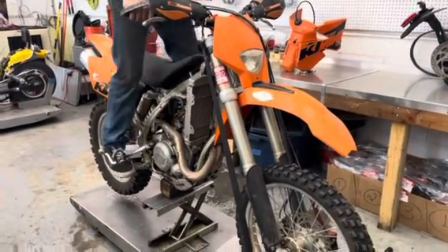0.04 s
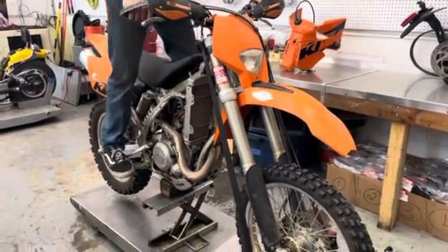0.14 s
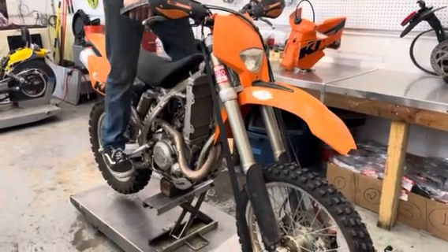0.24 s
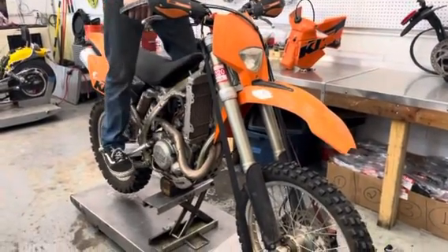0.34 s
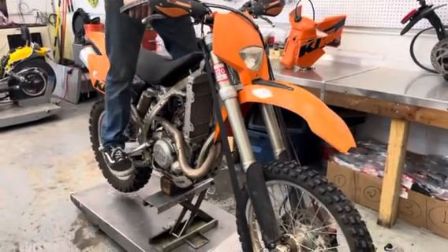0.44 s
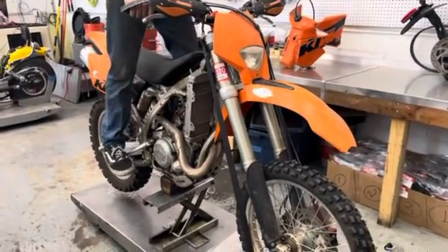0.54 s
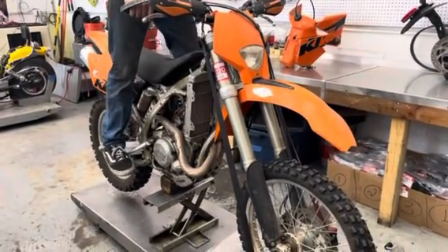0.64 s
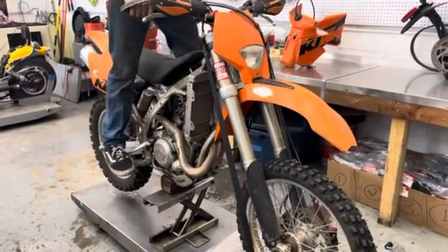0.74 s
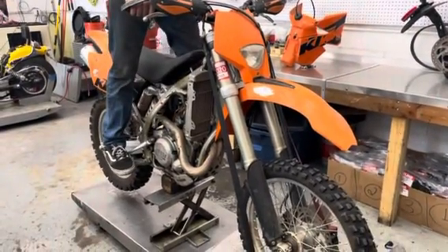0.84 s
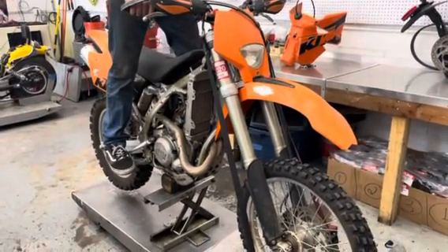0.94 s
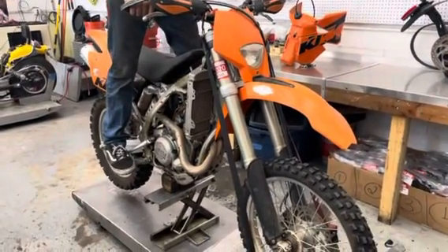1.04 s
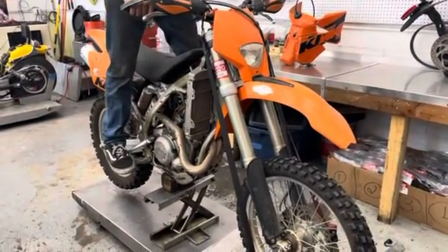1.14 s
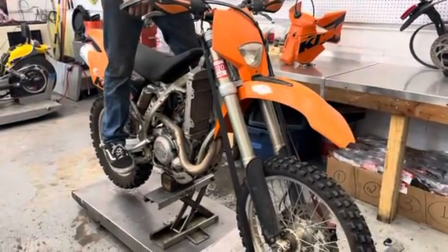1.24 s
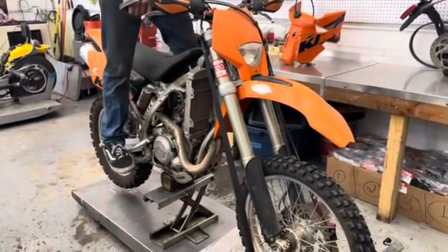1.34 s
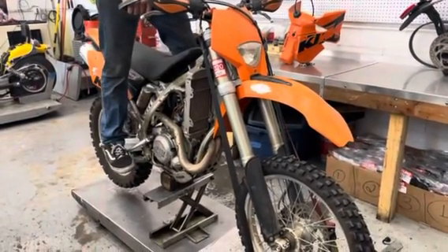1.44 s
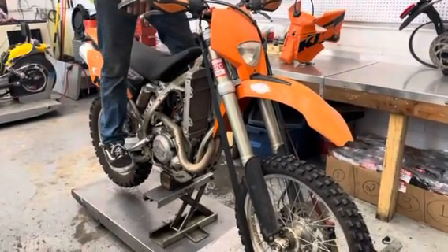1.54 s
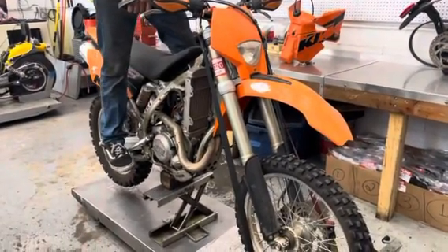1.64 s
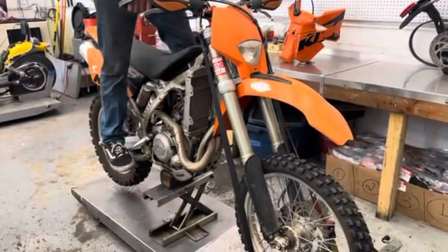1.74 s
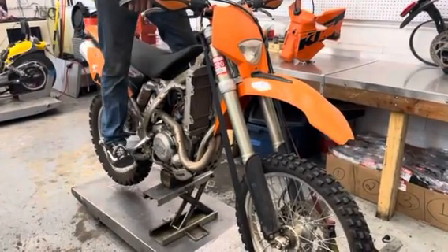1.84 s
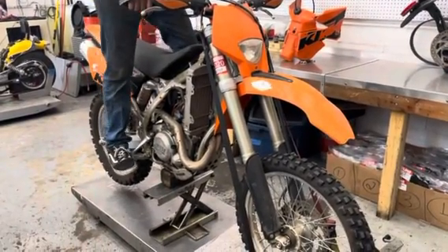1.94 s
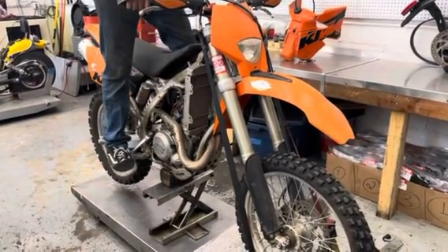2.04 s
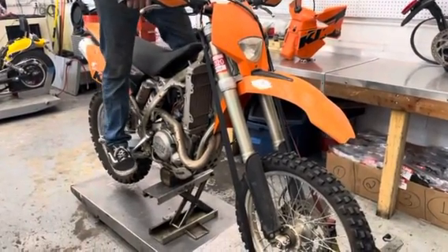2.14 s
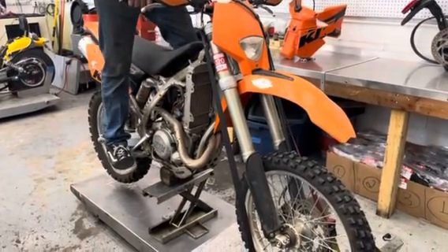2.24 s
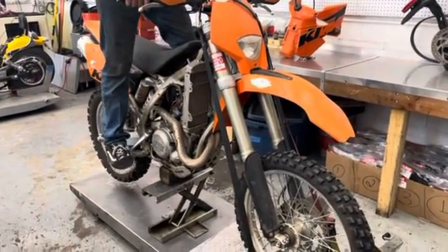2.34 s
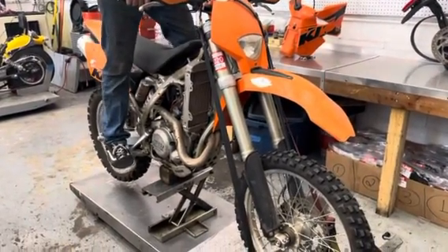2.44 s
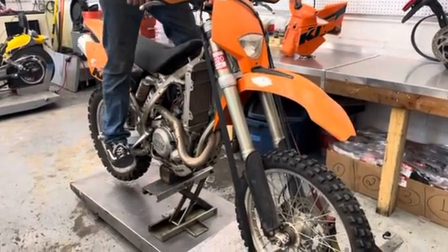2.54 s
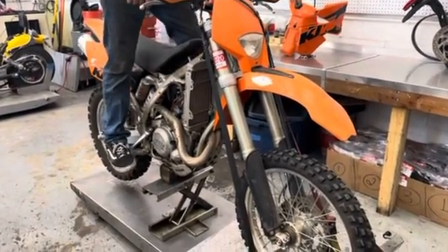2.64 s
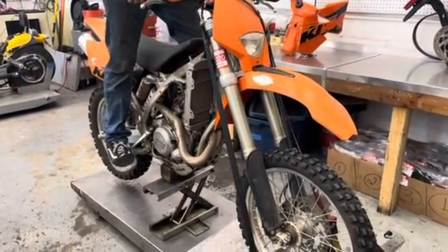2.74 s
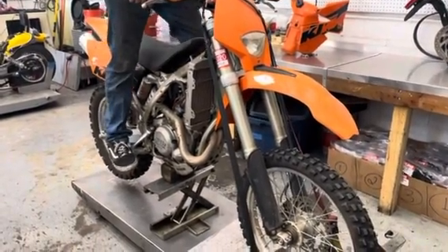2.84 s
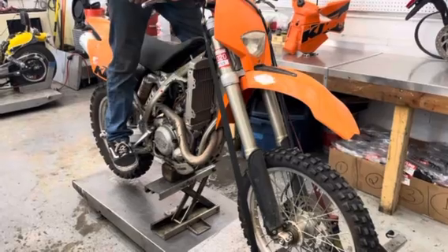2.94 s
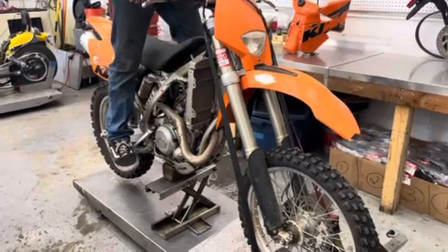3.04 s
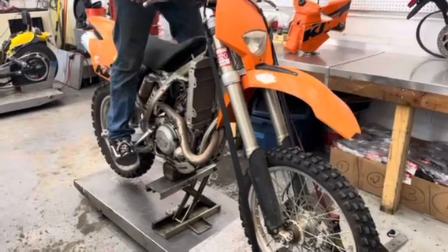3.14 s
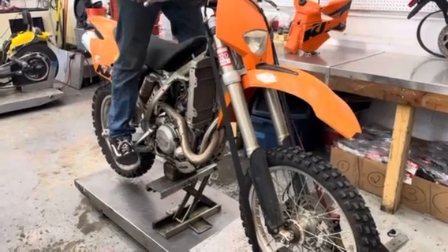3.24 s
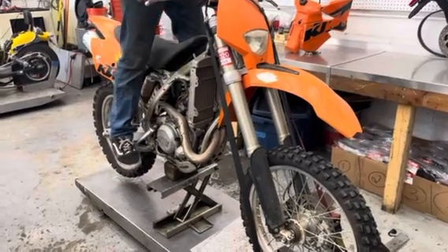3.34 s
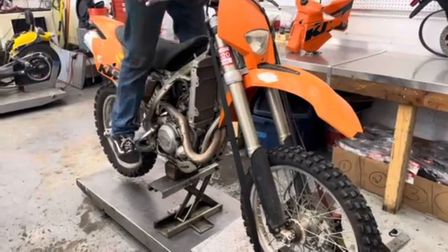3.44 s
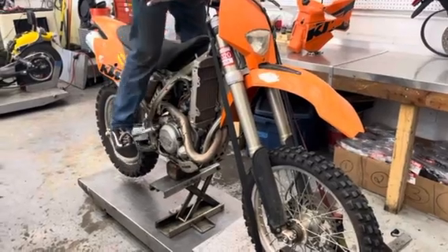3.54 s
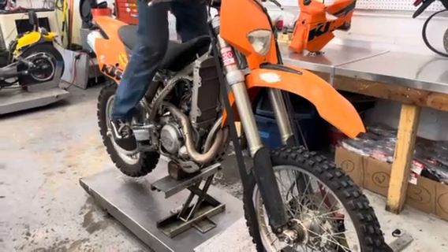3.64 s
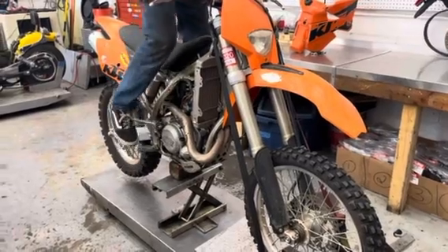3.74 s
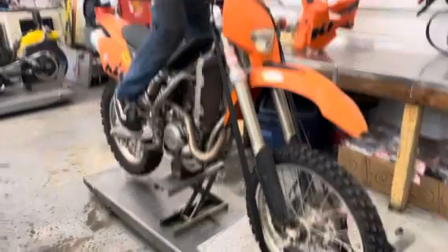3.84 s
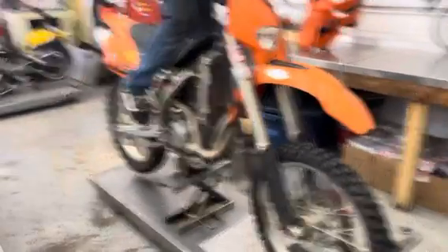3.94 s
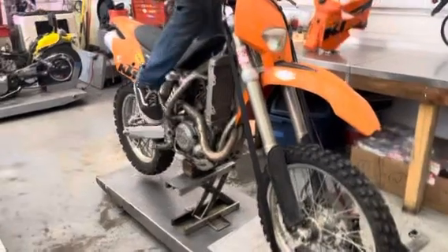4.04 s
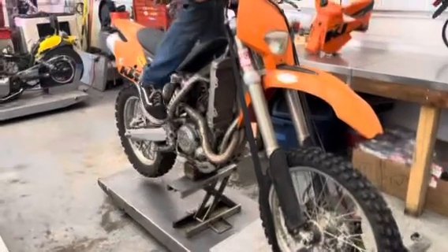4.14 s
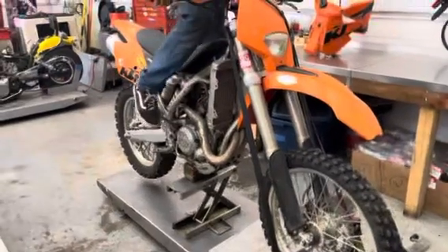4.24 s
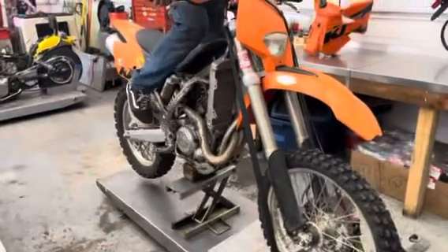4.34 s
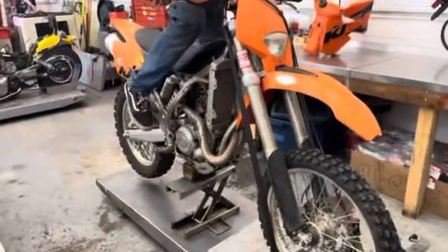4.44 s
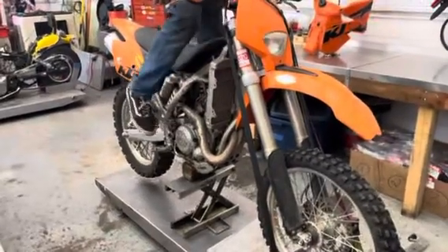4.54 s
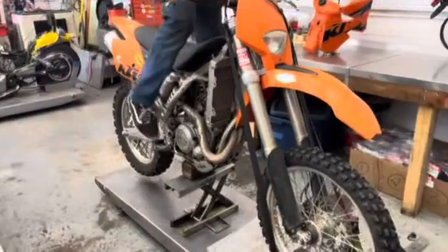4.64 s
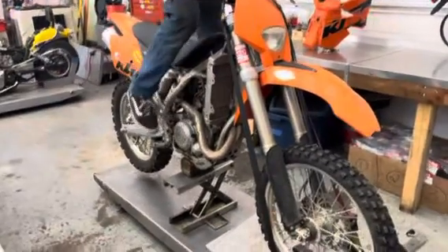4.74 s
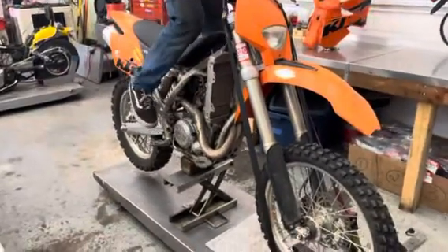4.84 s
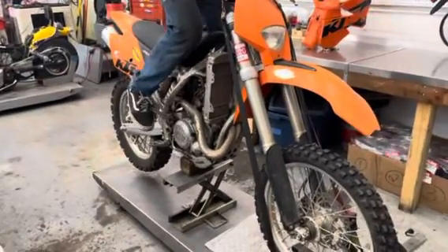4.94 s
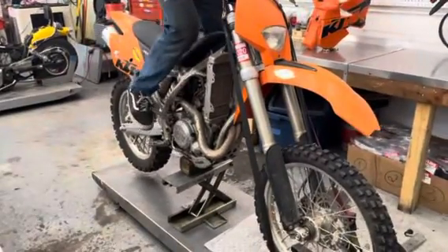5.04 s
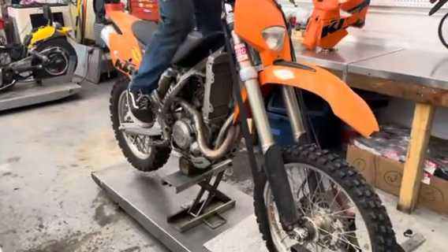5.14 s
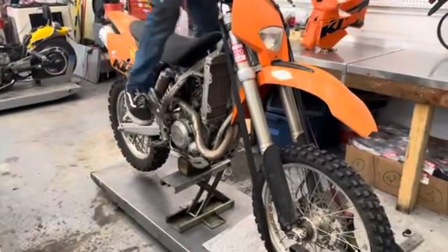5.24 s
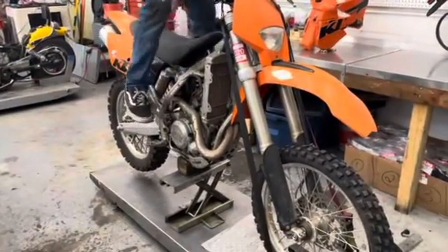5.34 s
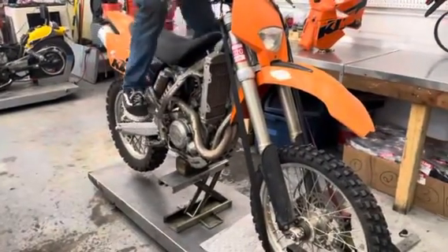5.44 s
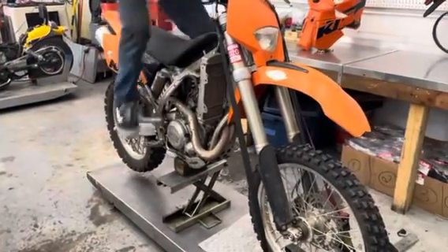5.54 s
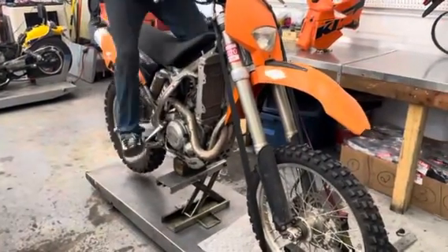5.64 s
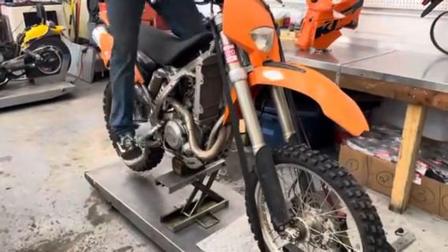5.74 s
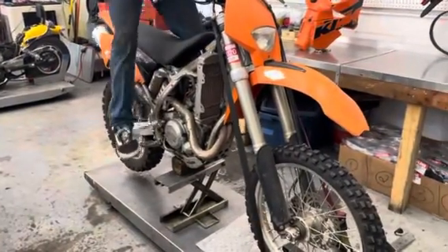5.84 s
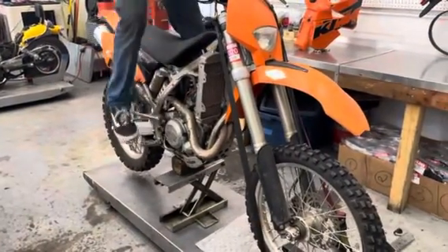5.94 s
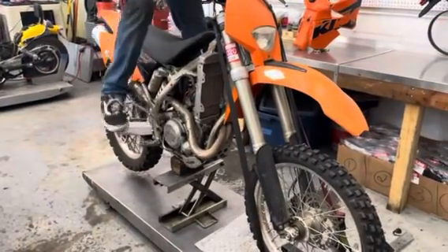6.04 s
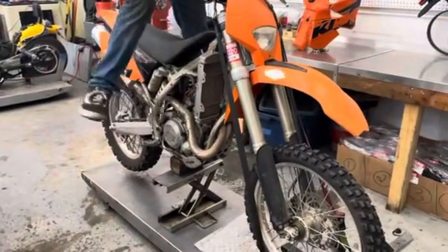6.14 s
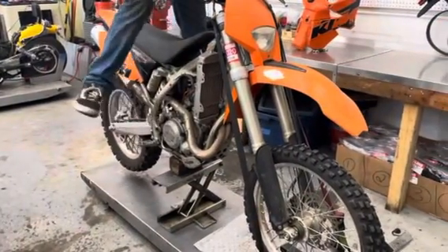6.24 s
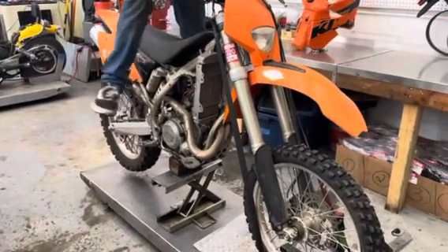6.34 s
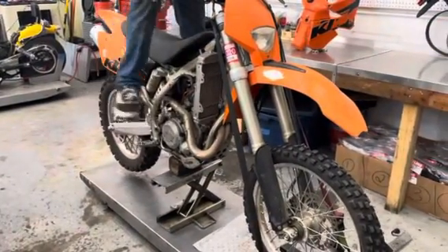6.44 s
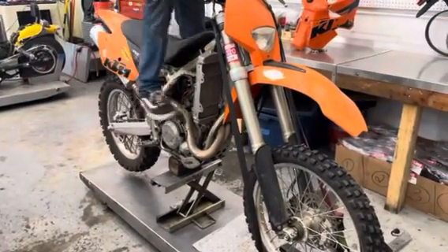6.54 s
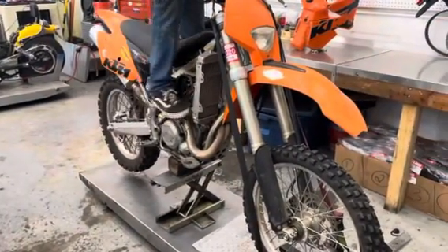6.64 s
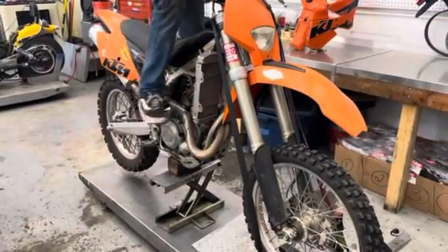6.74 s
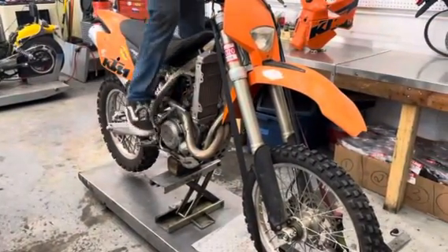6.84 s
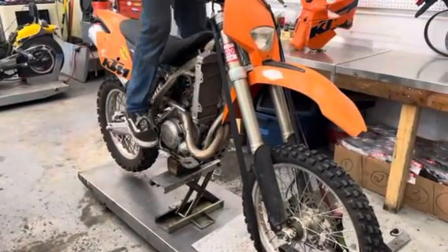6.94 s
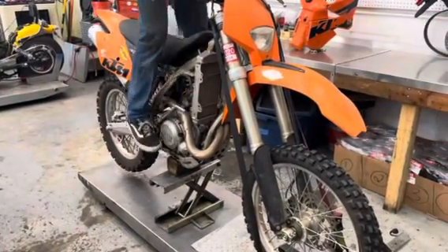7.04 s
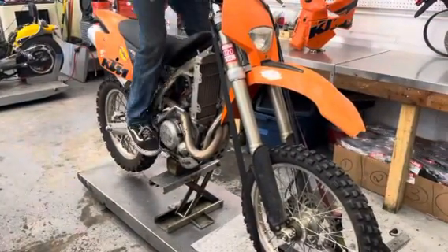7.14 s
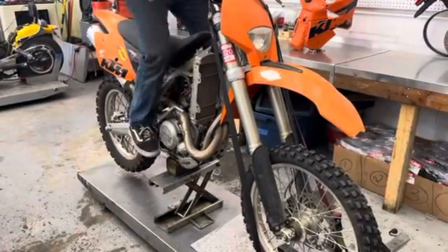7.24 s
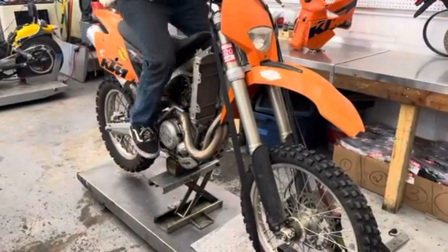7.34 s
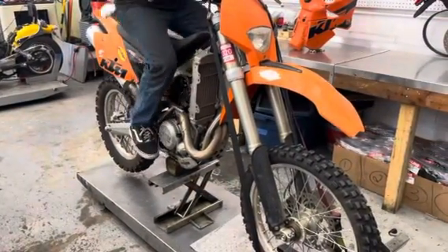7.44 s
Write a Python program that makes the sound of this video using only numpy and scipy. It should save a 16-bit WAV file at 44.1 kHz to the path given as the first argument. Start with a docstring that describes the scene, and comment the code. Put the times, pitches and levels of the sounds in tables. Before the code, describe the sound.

A motorcycle kick-start lever gives a few metallic clicks, a clunk and a short burst of ratcheting over a distant compressor hum, with occasional low air bumps on the microphone. After a pause, a sharp kick starts the single-cylinder engine. It runs with an uneven, booming exhaust and valve clatter, stumbles briefly, then begins to rev, ringing a little off the workshop walls.

```python
"""Dirt bike kick-start in a concrete workshop.

A compressor hums far off. The kick lever knocks and ratchets; air puffs bump the microphone.
The single cylinder fires, runs unevenly, stumbles and picks up as the throttle opens.
Each firing rings pipe and silencer; valve taps ring the cases; intake and tailpipe gas rasps."""
import sys
import numpy as np
from scipy import signal
from scipy.fft import rfft, irfft, next_fast_len
from scipy.io import wavfile

SR = 44100
rng = np.random.default_rng(int(sys.argv[2]) if len(sys.argv) > 2 else 0)


def dump_mix(stems):
    """Bounce the given channels to the path in sys.argv[1] as a 16-bit WAV at rate SR."""
    frames = np.atleast_2d(stems).T  # one column per channel
    limited = np.clip(frames, -1, 1)  # hard clip at full scale
    pcm = np.round(limited * 32767).astype(np.int16)
    wavfile.write(sys.argv[1], SR, pcm)


N = 330750
TIME_S = np.arange(N) / SR

# shop air noise: f/Hz, density/dB
AIR_SPECTRUM = [(15, -34), (30, 1.5), (120, -10), (155, -16.5), (300, -13.5), (700, -14.5), (2000, -23.5),
                (4500, -35.5), (7000, -43), (10000, -42.5), (16000, -32)]
# wall reverberation: f/Hz, t60/s
WALL_DECAY = [(100, 1), (250, 0.84), (500, 0.81), (2000, 1), (5000, 0.55), (9000, 0.19), (14000, 0.55)]
# compressor: t/s, shaft/Hz, listening place (clamped to 0-2)
COMPRESSOR_RUN = [(0, 48.11, 0.049), (1.5, 47.86, 0.31), (2.2, 47.71, 0.8), (3.5, 47.64, 0.97),
                  (4.2, 47.93, 1.5), (5.0, 47.28, 7.7), (7.5, 47.07, 2.17)]
# compressor orders: shaft multiple, level/dB at places 0, 1, 2
COMPRESSOR_ORDERS = [(2, -56.5, -57, -66), (4, -50.5, -45.5, -46), (5, -56.5, -71, -53.5),
                     (8, -43.5, -80, -60), (9, -61.5, -55.5, -56), (11, -57.5, -53.5, -57.5),
                     (12, -49.5, -53.5, -53.5), (13, -61.5, -51.5, -56), (14, -95, -89, -55.5),
                     (16, -76.5, -54, -63), (18, -66, -63, -82), (20, -61, -61.5, -65),
                     (21, -59.5, -60, -62.5)]
# other motors: f/Hz, level/dB at places 0, 1, 2
MOTOR_TONES = [(119.8, -67.5, -50.5, -53), (350, -51.5, -56.5, -58.5)]
# air puffs on the microphone: peak t/s, level/dB, t60/s
AIR_PUFFS = [(1.04, -58, .2), (1.17, -31, 0.32), (1.27, -28.5, 0.31), (1.395, -28, 0.4),
             (1.45, -32.5, 0.67), (1.58, -35.5, 0.26), (3.13, -30, 0.31), (3.19, -51, 0.27),
             (3.31, -31, 0.45), (3.39, -51, .3), (5.08, -37, 1), (5.28, -52, 0.24), (5.41, -39, 0.27),
             (5.551, -27.5, 0.98)]
# microphone ports: f/Hz, sum/dB, difference/dB, left minus right/dB
MIC_PORTS = [(12, -50, -40, 10), (40.4, -4, -22, -0.5), (200, 2.5, -12.5, -0.5), (665, -1.5, -4.5, -0.5),
             (1180, 3.5, 3.5, -2), (2720, 3.5, 0.5, 1.5), (3750, 1.5, 2, 6.5), (6140, -2, -5, 4),
             (7290, -6, 0, -1), (8720, -39.5, -0.5, 1.5), (10000, -10.5, -12, -11),
             (10540, -13.5, -13.5, 21), (10800, -10, -42, -1), (12600, -14.5, -44, 0),
             (14600, -22, -6.5, -1), (15400, -32, -11, 9)]
# kick lever knocks: t/s, ring/dB, brightest f/Hz, crack/dB, snap/dB
LEVER_KNOCKS = [(0.2754, -17, 4400, -34, -33), (0.279, -20.5, 1900, -38, -60), (0.293, -19, 3000, -37, -60),
                (0.308, -25, 2600, -44, -60), (0.315, -24.5, 2400, -38, -60), (1.888, -6, 1200, -22, -20.5),
                (1.916, -10.5, 1550, -18.5, -46), (1.988, -19.5, 2650, -34, -60),
                (3.939, -27, 3900, -31, -36), (4.333, -21, 3500, -32, -46), (4.339, -27, 2900, -39, -60),
                (5.623, -5.5, 2460, -9, -4.5)]
# lever and stop, damped by the boot: f/Hz, level/dB, t60/s
LEVER_MODES = [(1110, -5, .04), (1270, -2, .05), (1420, -5, .03), (1570, -5, .03), (1950, -9, .025),
               (2320, -5, .02), (2560, -1, .035), (2750, -2, .032), (3214, -8, .02), (3736, -3, .025),
               (4050, -5, .02), (4490, 0, .03), (4680, 1, .038), (5900, -8, .015), (7100, -11, .015)]
# low thuds and the engine's first exhaust coughs (last three rows): t/s, level/dB, f/Hz
THUDS_AND_COUGHS = [(.005, -36, 200), (.03, -38.5, 98), (1.891, -30, 400), (1.906, -29, 600),
                    (1.922, -28, 505), (1.933, -27, 300), (1.943, -24, 209), (1.953, -24, 400),
                    (1.964, -30, 330), (1.978, -29, 160), (2.191, -38, 200), (3.864, -34, 900),
                    (3.879, -37, 1150), (3.884, -50, 570), (3.893, -30, 660), (3.894, -42, 1390),
                    (3.895, -35, 179), (4.551, -40, 200), (5.635, -16.5, 400), (5.651, -15.5, 233),
                    (5.664, -20, 346)]
# starter ratchet: t/s, level/dB, chatter/s
RATCHET_TICKS = [(3.531, -26, 0.018), (3.6055, -22, 0.016), (3.671, -23, 0.013), (3.7284, -25.5, .012),
                 (3.783, -23.5, 0.011), (3.823, -38, .004), (3.837, -28, 0.014), (3.892, -21.5, 0.0072),
                 (4.0234, -34, 0.0072), (4.299, -31.5, 0.0052)]
# ratchet pawl: f/Hz, level/dB, t60/s
PAWL_MODES = [(1960, -8, .03), (2420, -11, .012), (3740, -2, .018), (4226, 1, .024), (4600, -9, .01),
              (6000, -10, .01), (7400, -16, .01), (11000, -12, .01)]
# engine speed: t/s, firing rate/Hz
FIRING_RATE = [(5.62, 16.09), (5.75, 17.14), (6.02, 22.71), (6.45, 23.52), (6.75, 18.11), (6.96, 16.41),
               (7.06, 12.62), (7.17, 14.9), (7.325, 17.2), (7.365, 28.2), (7.53, 28.9)]
# engine levels: t/s, effort/dB, boom/dB, bark/dB, rasp/dB
ENGINE_LEVELS = [(5.5, -59, -19, -53, -75), (5.56, -46, -30, -38, -49.5), (5.61, -28, -32, -24, -43.5),
                 (5.67, -26, -11.5, -13, -20.5), (5.75, -24.5, -8, -13.5, -26),
                 (5.88, -22, -9.5, -15.5, -23), (6.0, -24.5, -16, -21, -30.5),
                 (6.3, -24, -15.5, -17, -30.5), (6.65, -26.5, -16, -20.5, -31.5),
                 (6.9, -29, -14, -22, -33.5), (7.05, -29, -20, -23.5, -35), (7.19, -30, -21.5, -29.5, -36),
                 (7.28, -26, -15.5, -15, -26.5), (7.34, -17, -8, -17, -18), (7.4, -18, -24, -14, -21.5),
                 (7.45, -18, -26, -13, -22.5), (7.5, -19, -34, -6, -20.5)]
# harder and weaker firings: t/s, excess/dB
UNEVEN_FIRINGS = [(5.68, 1.5), (5.74, -1), (5.80, -3), (5.85, -2.5), (5.90, -2), (5.95, -6), (5.995, 4),
                  (6.04, 3), (6.09, -0.5), (6.125, -1.5), (6.17, 1.5), (6.21, 1.5), (6.255, 2.5),
                  (6.30, -1), (6.34, -0.5), (6.385, 1), (6.425, 2), (6.47, -9), (6.51, 1), (6.56, 0),
                  (6.61, 2.5), (6.66, -1.5), (6.71, 3), (6.765, -3), (6.82, -7.5), (6.875, 1), (6.94, 0.5),
                  (7.0, -13), (7.075, 9.5), (7.148, 2), (7.215, 10), (7.275, 3), (7.335, 1), (7.375, 1.5),
                  (7.41, -0.5), (7.445, -3), (7.48, -2.5)]
# valve and chain rattle: f/Hz, density/dB
RATTLE_SPECTRUM = [(300, 3.5), (600, 5.5), (1100, 3), (1600, -7), (1800, -8.5), (2500, -4), (3400, -9.5),
                   (4200, -10), (5500, -16.5), (7000, -36), (9000, -34)]
# engine cases: f/Hz, level/dB, t60/s
CASE_MODES = [(1029, -4.5, 0.052), (1115, -2, 0.043), (1294, 1, 0.049), (1463, -1.5, 0.034),
              (1648, -4.5, 0.051), (1955, -5, 0.027), (2283, -3.5, 0.034), (2500, -2, 0.024),
              (2762, -1.5, 0.022), (3037, -4, 0.032), (3686, -3.5, 0.015), (3768, -0.5, 0.021),
              (4205, -1, 0.018), (4670, -4, 0.018)]
# louder valve gear taps: t/s, level/dB
LOUD_TAPS = [(5.859, -25), (6.0594, -12), (6.304, -12), (6.35, -29), (6.391, -11), (6.479, -22),
             (6.763, -11.5), (6.947, -28), (7.213, -12.5), (7.275, -6), (7.332, -15), (7.348, -19)]
# intake and tailpipe gas: f/Hz, density/dB
RASP_SPECTRUM = [(2500, -9), (4300, -2.5), (6000, -6.5), (7500, -9), (10000, -3), (13000, -3),
                 (16000, -1.5)]
# exhaust boom, pipe and walls together: f/Hz, level/dB, t60/s
BOOM_MODES = [(37.6, -8.5, 0.32), (52, -17.5, 0.32), (93.2, 4.5, 0.15), (109.3, 0, 0.2), (130, -6.5, 0.11)]
# silencer bark: f/Hz, level/dB, t60/s
BARK_MODES = [(230, 2.5, 0.023), (182, 0, 0.046), (194.2, 3.5, 0.078), (235.6, 1, 0.052), (241, 1.5, 0.051)]
# upper exhaust resonances: f/Hz, level/dB, t60/s
GROWL_MODES = [(342, -1.5, 0.033), (466, 3, 0.055), (490.7, 0.5, 0.05), (600, -2.5, 0.049),
               (689, -11, 0.08)]


def from_db(db):
    """Decibels to gain."""
    return 10 ** (np.asarray(db) / 20)


def unit_rms(x):
    """Scale to rms 1."""
    return x / np.sqrt(np.mean(x ** 2) + 1e-20)


def in_time(rows, outside=None):
    """Columns of a time table, interpolated per sample."""
    t_s, *columns = np.transpose(rows)
    return [np.interp(TIME_S, t_s, column, outside, outside) for column in columns]


def at_hz(table, hz, column=1):
    """Table lookup on a log-frequency axis."""
    table = np.array(table)
    return np.interp(np.log(hz + 1), np.log(table[:, 0]), table[:, column])


def coloured(x, db_at):
    """FFT filter with gain db_at(hz)."""
    size = next_fast_len(x.shape[-1])
    gain = from_db(db_at(np.arange(size // 2 + 1) * SR / size))
    return irfft(rfft(x, size) * gain, size)[..., :x.shape[-1]]


def butter(x, edges_hz, kind):
    """Butterworth filter, order 2."""
    return signal.sosfilt(signal.butter(2, edges_hz, kind, fs=SR, output="sos"), x)


def drift(rate_hz):
    """Slow random wander, rms 1."""
    steps = rng.standard_normal(int(N / SR * 60) + 3)
    return unit_rms(np.interp(TIME_S * rate_hz, np.arange(len(steps)), steps))


def resonate(x, hz, t60_s):
    """One damped mode."""
    radius, angle = from_db(-60 / (t60_s * SR)), 2 * np.pi * hz / SR
    return signal.lfilter([0, np.sin(angle)], [1, -2 * radius * np.cos(angle), radius ** 2], x + 1e-18)


def strike(at_s, level_db, modes, scatter_db, chatter_s=0):
    """Clicks ring the modes; level_db is (events, modes). A loose part hits ten times in chatter_s."""
    touches = 10 if np.any(chatter_s) else 1
    late_s = chatter_s * rng.random((len(at_s), touches)) * (np.arange(touches) > 0)
    at = np.clip(((np.asarray(at_s)[:, None] + late_s) * SR).astype(int), 0, N - 1)
    level_db = level_db + scatter_db * rng.standard_normal((len(at), len(modes)))
    rings = np.zeros(N)
    for k, (hz, db, t60_s) in enumerate(modes):
        clicks = np.zeros(N)
        clicks[at] = (-1) ** (k + 1) * from_db(level_db[:, k, None] + db) / np.sqrt(touches)
        rings += resonate(clicks, hz, t60_s)
    return rings


def bursts(at_s, level_db, decay_s, band_hz):
    """Band noise decaying after each event."""
    clicks = np.zeros(N)
    clicks[(at_s * SR).astype(int)] = from_db(level_db)
    envelope = signal.lfilter([1], [1, -np.exp(-1 / (decay_s * SR))], clicks + 1e-18)
    return envelope * unit_rms(butter(rng.standard_normal(N), band_hz, "band"))


def workshop_reverb(x):
    """Two independent noise tails, decaying octave by octave."""
    age_s, tails = np.arange(SR) / SR, 0
    for low_hz in 22 * 2. ** np.arange(10):
        band = butter(rng.standard_normal((2, SR)), (low_hz, min(2 * low_hz, .45 * SR)), "band")
        tails += band * from_db(-60 * age_s / at_hz(WALL_DECAY, np.sqrt(2) * low_hz))
    tails *= np.minimum(age_s / 0.011, 1) ** 2   # reflections build up
    return signal.fftconvolve(x[None], unit_rms(tails) / np.sqrt(SR), axes=1)[:, :N]


def shop_air(air_db=-42.5, bang_db=-37, bang_t60_s=0.96):
    """Steady diffuse noise; a brighter bang dies away at the start."""
    air = coloured(rng.standard_normal((2, N)), lambda hz: at_hz(AIR_SPECTRUM, hz))
    bang = coloured(rng.standard_normal((2, N)),
                    lambda hz: at_hz(AIR_SPECTRUM, hz) + 2.2 * np.log2(hz + 50))
    bang_gain = from_db(bang_db - 60 * TIME_S / bang_t60_s)
    return from_db(air_db) * unit_rms(air) + bang_gain * unit_rms(bang)


def compressor_hum():
    """Shaft orders and two motor tones; levels waver and shift with the listening place."""
    shaft_hz, place = in_time(COMPRESSOR_RUN)
    turns = np.cumsum(shaft_hz) / SR
    partials = [(order * turns, db) for order, *db in COMPRESSOR_ORDERS]
    partials += [(hz * TIME_S, db) for hz, *db in MOTOR_TONES]
    hum = 0
    for cycles, place_db in partials:
        level_db = np.interp(place, (0, 1, 2), place_db) + 2.14 * drift(rate_hz=3.554)
        hum += from_db(level_db) * np.exp(2j * np.pi * (cycles + rng.random()))
    return np.sqrt(2) * np.array([hum.real, hum.imag])


def air_puffs(rise_db_per_s=300, centre_hz=70):
    """Air on the microphone ports: low noise, fast swell, slower decay."""
    envelope = 0
    for peak_s, db, t60_s in AIR_PUFFS:
        age_s = TIME_S - peak_s
        envelope += from_db(db + np.minimum(rise_db_per_s * age_s, -60 * age_s / t60_s))
    rumble = coloured(rng.standard_normal((2, N)),
                      lambda hz: -14 * np.abs(np.log2((hz + 1) / centre_hz)))
    return envelope * unit_rms(rumble)


def kick_lever():
    """Knocks ring the lever modes nearest their brightest pitch and add a noise crack."""
    at_s, ring_db, bright_hz, crack_db, snap_db = np.transpose(LEVER_KNOCKS)
    offset_oct = np.log2(np.array(LEVER_MODES)[:, 0] / bright_hz[:, None])
    rings = strike(at_s, ring_db[:, None] - 15.5 - 4 * offset_oct ** 2, LEVER_MODES, scatter_db=2)
    body_db = crack_db - 2 - 13 * np.log2(bright_hz / 1300)   # duller knocks have more body
    cracks = bursts(at_s, crack_db, decay_s=0.0054, band_hz=(2080, 7600))
    cracks += bursts(at_s, body_db, decay_s=0.0045, band_hz=(900, 2400))
    cracks += bursts(at_s, snap_db, decay_s=0.0024, band_hz=(6750, 16800))
    return rings, cracks


def thuds_and_coughs():
    """Low thuds and the engine's first exhaust coughs: three short modes and a noise burst each."""
    rings = 0
    for t_s, db, hz in THUDS_AND_COUGHS:
        modes = [(hz * ratio, 0, 8 / hz) for ratio in (.7, 1, 1.5)]
        rings += strike([t_s], db, modes, scatter_db=1.5)
    at_s, level_db, _ = np.transpose(THUDS_AND_COUGHS)
    return rings + bursts(at_s, level_db - 2.5, decay_s=0.006, band_hz=(300, 1010))


def ratchet():
    """The starter pawl chatters: a ring and a noise tick each time."""
    at_s, level_db, chatter_s = np.transpose(RATCHET_TICKS)
    rings = strike(at_s, level_db[:, None] - 9, PAWL_MODES, scatter_db=0, chatter_s=chatter_s[:, None])
    return rings, bursts(at_s, level_db - 15, decay_s=0.011, band_hz=(1890, 16000))


def valve_rattle(level_db, rate_hz=800):
    """Random valve and chain taps: a broad rattle plus ringing cases."""
    taps = from_db(3.45 * np.minimum(rng.exponential(1, N), 4)) * rng.choice([-1, 1], N)
    sparse_taps = taps * (rng.random(N) < rate_hz / SR)
    rattle = coloured(sparse_taps, lambda hz: at_hz(RATTLE_SPECTRUM, hz))
    mode_hit, rings = rng.integers(0, 300, N), 0   # 1 sample in 300 taps a given mode
    for k, (hz, db, t60_s) in enumerate(CASE_MODES):
        rings += from_db(db + 1.85 * drift(rate_hz=20)) * resonate(taps * (mode_hit == k), hz, t60_s)
    return from_db(level_db) * (unit_rms(rattle) + from_db(-5.5) * unit_rms(rings))


def gas_rasp(level_db):
    """Intake and tailpipe gas: bright, flickering noise."""
    gas = coloured(rng.standard_normal(N), lambda hz: at_hz(RASP_SPECTRUM, hz))
    return unit_rms(gas) * from_db(level_db + 2 * drift(rate_hz=33))


def valve_taps(fired_s, clatter_db, rasp_db, seat_delay_s=0.011):
    """Valves seat after each firing, ticking and ringing the cases; some louder taps stand out."""
    seat_s = fired_s + seat_delay_s
    tick_db = rasp_db - 2.5 + 5.7 * rng.standard_normal(len(seat_s))
    taps = bursts(seat_s, tick_db, decay_s=0.007, band_hz=(1980, 15000))
    taps += strike(seat_s, clatter_db[:, None] + 0.5, CASE_MODES, scatter_db=4, chatter_s=.012)
    loud_s, loud_db = np.transpose(LOUD_TAPS)
    taps += strike(loud_s, loud_db[:, None] - 17, CASE_MODES, scatter_db=0, chatter_s=.005)
    return taps + bursts(loud_s, loud_db - 14, decay_s=0.0067, band_hz=(3020, 15100))


def exhaust_boom(fired_s, level_db):
    """Each firing gives the low modes of pipe and walls a broad push."""
    return butter(strike(fired_s, level_db[:, None], BOOM_MODES, scatter_db=2.5), 350, "low")


def exhaust_bark(fired_s, bark_db, growl_db, echo_s=0.01042, echo_db=-8.5):
    """Each pulse rings the silencer and returns inverted from the open end; gas noise follows."""
    pipe = strike(fired_s, bark_db[:, None], BARK_MODES, scatter_db=2.5)
    pipe += strike(fired_s, growl_db[:, None], GROWL_MODES, scatter_db=4)
    pipe = butter(pipe, 900, "low")   # finite valve opening time
    pipe -= from_db(echo_db) * np.interp(TIME_S - echo_s, TIME_S, pipe)
    turbulence = bursts(fired_s, growl_db - 13.5, decay_s=0.03, band_hz=(200, 660))
    silencer_roar = bursts(fired_s, bark_db - 10.5, decay_s=0.03, band_hz=(175, 341))
    pop_db = growl_db - 10 + 3.1 * rng.standard_normal(len(fired_s))
    tailpipe_pop = bursts(fired_s, pop_db, decay_s=0.0044, band_hz=(400, 2200))
    return pipe + turbulence + silencer_roar + tailpipe_pop


def firings(cycles, jitter_s=0.00047):
    """One firing per cycle: its time and excess level."""
    fired_s = np.flatnonzero(np.diff(np.floor(cycles), prepend=0)) / SR - .004
    fired_s += jitter_s * rng.standard_normal(len(fired_s))
    uneven_s, uneven_db = np.transpose(UNEVEN_FIRINGS)
    nearest = np.abs(fired_s - uneven_s[:, None]).argmin(axis=1)
    excess_db = np.zeros(len(fired_s))
    excess_db[nearest] = uneven_db
    return fired_s, excess_db


def engine(usual_effort_db=-27, uneven_share=0.24):
    """Single cylinder: firings pulse the exhaust; valve gear and gas throb with the crank."""
    cycles = np.cumsum(in_time(FIRING_RATE, outside=0)[0]) / SR
    fired_s, excess_db = firings(cycles)
    at = (fired_s * SR).astype(int)
    effort_db, boom_db, bark_db, rasp_db = in_time(ENGINE_LEVELS, outside=-99)
    growl_db = -26 + 1.58 * (effort_db - usual_effort_db)
    clatter_db = -32.5 + 0.73 * (effort_db - usual_effort_db)
    boom = exhaust_boom(fired_s, boom_db[at] + excess_db)
    bark = exhaust_bark(fired_s, bark_db[at] + excess_db, growl_db[at] + excess_db)
    angle = 2 * np.pi * cycles
    throb_db = 1.82 * np.cos(angle - .6) + 1.75 * np.cos(2 * angle - .3)
    throb_db += uneven_share * np.interp(TIME_S - .013, fired_s, excess_db)
    clatter = valve_rattle(clatter_db + throb_db) + gas_rasp(rasp_db + 0.96 * throb_db)
    clatter += valve_taps(fired_s, clatter_db[at], rasp_db[at])
    return boom, bark, clatter


def scene():
    """Sum and difference fields at the microphone; their direct sound is 90 degrees apart."""
    boom, bark, clatter = engine()
    lever_rings, lever_cracks = kick_lever()
    thuds = thuds_and_coughs()
    pawl_rings, pawl_ticks = ratchet()
    rings = lever_rings + pawl_rings
    transients = lever_cracks + thuds + pawl_ticks
    sends = [(boom, -12), (bark, -2.5), (clatter, -6), (rings, -10), (transients, -5.5)]
    reverb = workshop_reverb(sum(from_db(send_db) * layer for layer, send_db in sends))
    analytic = signal.hilbert(boom + bark + clatter + rings + transients, next_fast_len(N))[:N]
    direct = np.array([analytic.real, from_db(-2.5) * analytic.imag])
    return direct + reverb + compressor_hum() + shop_air() + air_puffs()


def record(dry, ceiling=1.08, stopband_hz=15900):
    """Microphone pair: port colour, left/right balance, soft clip, steep low-pass."""
    mid = coloured(dry[0], lambda hz: at_hz(MIC_PORTS, hz, column=1))
    side = coloured(dry[1], lambda hz: at_hz(MIC_PORTS, hz, column=2))
    left = coloured(mid + side, lambda hz: at_hz(MIC_PORTS, hz, column=3) / 2)
    right = coloured(mid - side, lambda hz: -at_hz(MIC_PORTS, hz, column=3) / 2)
    clipped = ceiling * np.tanh(np.array([left, right]) / ceiling)
    return signal.sosfilt(signal.cheby2(12, 70, stopband_hz, fs=SR, output="sos"), clipped)


dry = scene()
out = record(dry)
dump_mix(out)
```